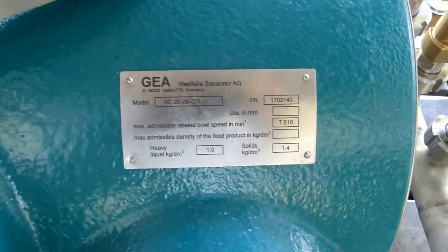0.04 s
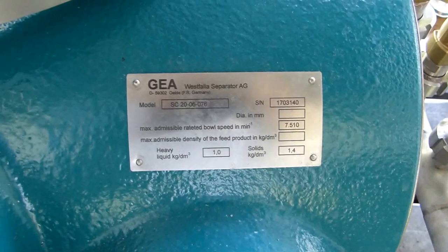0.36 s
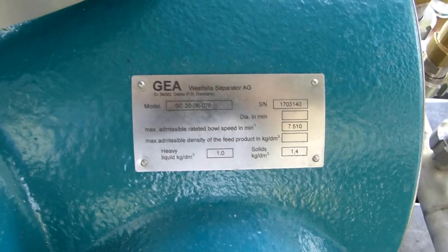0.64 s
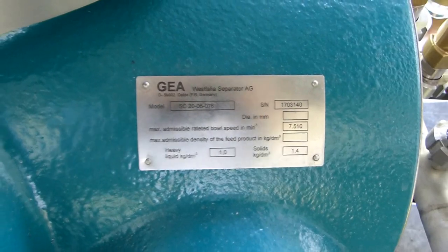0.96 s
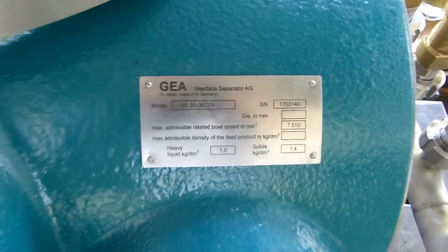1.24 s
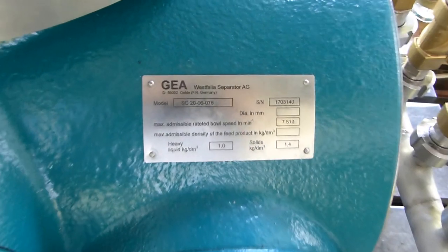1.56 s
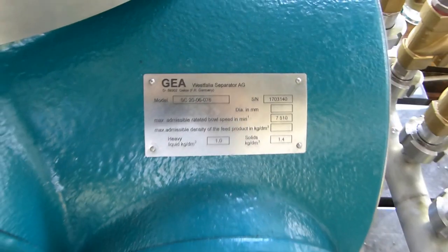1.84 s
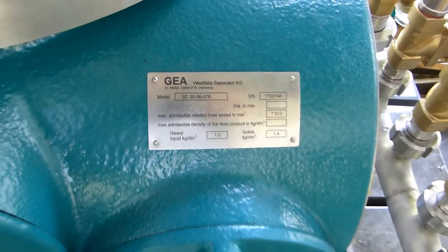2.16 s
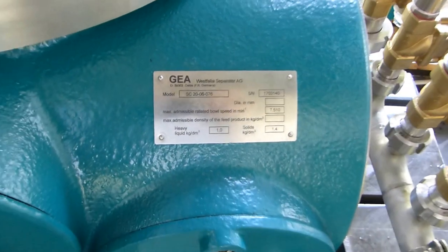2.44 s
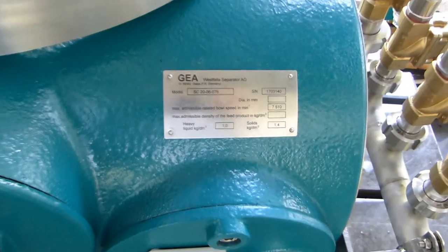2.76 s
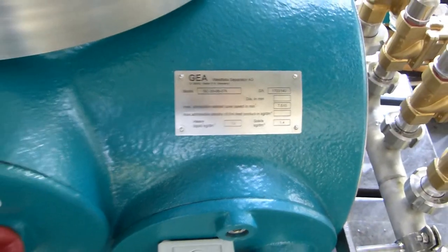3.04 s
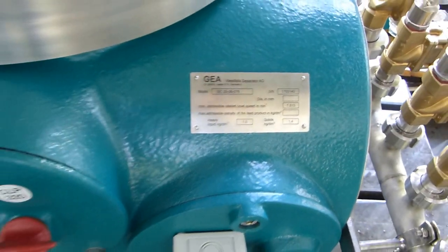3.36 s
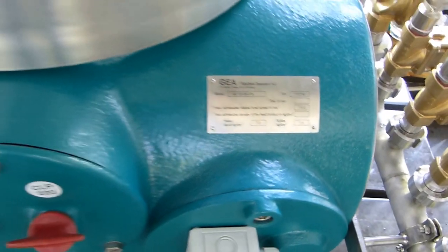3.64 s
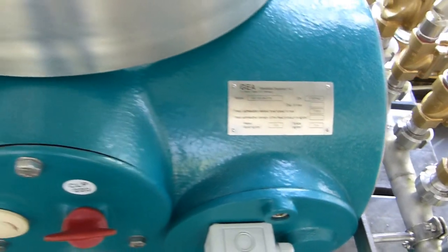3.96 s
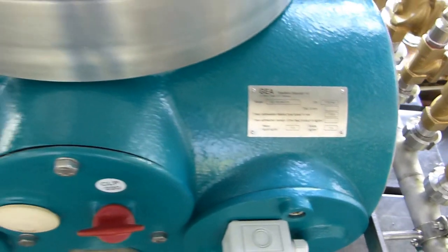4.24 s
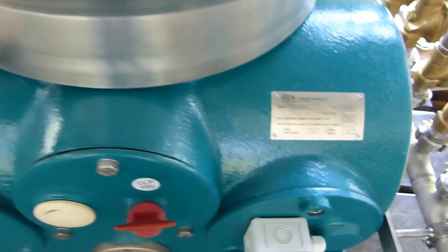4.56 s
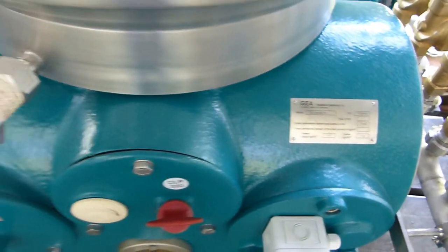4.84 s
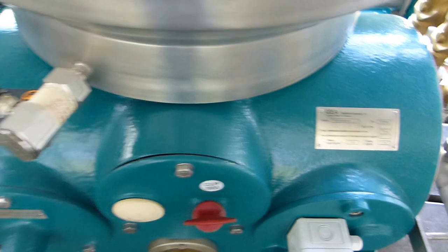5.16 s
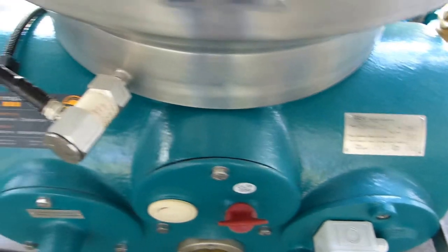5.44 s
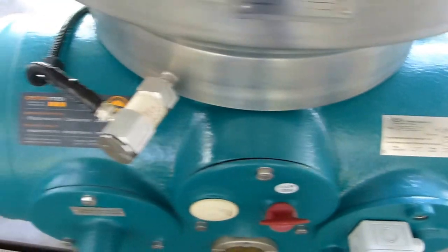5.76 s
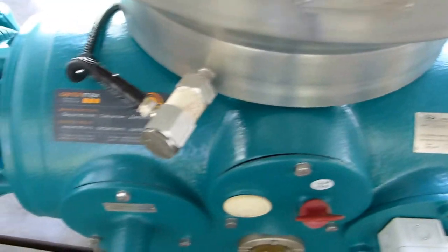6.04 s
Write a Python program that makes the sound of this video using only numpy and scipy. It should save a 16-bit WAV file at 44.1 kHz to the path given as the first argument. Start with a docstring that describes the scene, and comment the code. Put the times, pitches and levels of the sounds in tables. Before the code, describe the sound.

An industrial separator runs close by, with a steady, slightly rough high whine and hum over rushing air.

```python
"""A steady, slightly rough whine over rushing air: a centrifugal separator, close by in a workshop.
The spinning bowl whines on its twelfth order, with side tones one order apart. The slower motor adds
its own lines, and air and liquid rush through the ringing housing. The speed stays constant, but the
microphone drifts through standing waves and beams of sound, so tones swell, fade and change sides."""
import sys
import numpy as np
from scipy import signal
from scipy.fft import rfft, irfft
from scipy.io import wavfile

SR = 44100
rng = np.random.default_rng(int(sys.argv[2]) if len(sys.argv) > 2 else 0)


def store_wav(level_fs):
    """Save 16-bit WAV to argv[1]."""
    pcm = np.round(np.clip(np.atleast_2d(level_fs), -1, 1) * 32767)
    wavfile.write(sys.argv[1], SR, pcm.T.astype(np.int16))


N = 268569
TIME = np.arange(N) / SR
BIN_HZ = np.maximum(np.arange(N // 2 + 1) * SR / N, 1)
SIDES = np.array([[1], [-1]])   # left, right
BOWL_HZ, MOTOR_HZ = 126.9, 24.562   # turns per second
SWING_RAD_PER_S = 0.32   # the microphone turns, so the left side leads more and more


def bowl():
    """The spinning bowl: its whine, the neighbouring orders that roughen it, and fainter harmonics."""
    # strong orders as standing waves: (order, left [dB], right [dB], change [dB/s], node at [s],
    # node spacing [s], left echo [0-1], right echo [0-1], loudness swing factor, left lead [rad], flutter)
    orders = [(4, -47.5, -42.5, 1.5, 5.52, 9.9, 0.93, 1, 1.16, -0.8, 0.27),
              (5, -38.9, -27.5, -0.6, 1.84, 10.1, 0.05, 0.51, 1.6, -0.76, 0.03),
              (6, -31.5, -32.5, -0.08, 3.31, 10.6, 0.84, 1, 0.97, -0.3, 0),
              (11, -28, -26, 1.4, 0.92, 4.7, 0.3, 0.98, 0.45, -0, 0.036),
              (13, -38, -40, 1.05, 4.12, 2.05, 0.11, 0.46, 0.81, -0.9, 0.18),
              (24, -42.1, -39, -0.5, 5.63, 1.65, 0.8, 0.66, 0.01, 0.0, 0.07)]
    # weak orders: (rough pitch [Hz], level at mid-path [dB], change [dB/s])
    faint = [(127, -61, -3), (254, -57.5, 0.5), (888, -67, 2), (1015, -49, 0), (2284, -51.5, 1),
             (2918, -48.5, -1), (3172, -47, -0.5), (4568, -55, -3.5), (4822, -53, 1.5)]
    angle = shaft(BOWL_HZ, wander=0.00004)
    return whine(angle) + standing_orders(angle, orders) + faint_orders(angle, BOWL_HZ, faint)


def whine(angle, gain_db=1.09):
    """The bowl's loud twelve-per-turn tone, and its octave, which is beamed one way."""
    # whine along the microphone's path: (time [s], relative level [dB], left minus right [dB])
    path = [(0.25, -16, 2.0), (0.35, -14, 2.5), (0.87, -15.5, 4), (1.53, -15, 10), (2.13, -13.5, 5),
            (2.77, -15, 4.5), (3.29, -16, 0), (3.55, -19, -3), (3.84, -24.5, -13), (4.26, -21.5, -6),
            (5.23, -12.5, -1.0), (5.77, -13, -2.0), (5.93, -15, -6), (6.08, -17.5, -13)]
    # which side the whine reaches first: (time [s], left lead [rad])
    lead = [(1.05, 0.45), (1.8, -0.63), (3.5, 0.09), (4.05, -1.05), (6.08, 0.71)]
    level_db, pan_db = in_time(path)
    balance = from_db(SIDES * pan_db / 2)
    gains = from_db(level_db + gain_db) * balance / balance.mean(axis=0)
    octave_db = through_beam(off_db=-64.5, extra_db=30.5, at_s=1.52, half_width_s=0.62)
    octave = strong_tone(24 * angle, from_db(octave_db), along_path(0, SWING_RAD_PER_S), flutter=0.08)
    return strong_tone(12 * angle, gains, in_time(lead)[0], flutter=0.023) + octave


def motor(angle):
    """The drive hums low and whines just under the bowl's tone, beating with it."""
    # hum and whine as standing waves: (order, left [dB], right [dB], change [dB/s], node at [s],
    # node spacing [s], left and right echo [0-1], loudness swing factor, left lead [rad], flutter)
    orders = [(8, -48.0, -51, -3.2, 1.32, 10, 0.0, 0.48, 0.5, -0.2, 0.15),
              (60, -32, -34, -1.1, 5.66, 6.4, 0.95, 0.7, 1.1, 0.1, 0.076)]
    # weak orders: (rough pitch [Hz], level at mid-path [dB], change [dB/s])
    faint = [(147, -56, -1.2), (1498, -67, -0.91), (1529, -38, -1.8), (1554, -38, -0.37),
             (1631, -44.5, 0.23), (2485, -49, -0.92), (2660, -50, -.5)]
    return standing_orders(angle, orders) + faint_orders(angle, MOTOR_HZ, faint)


def shaft(hz, wander):
    """Angle of a steady rotation whose speed hardly wanders."""
    return 2 * np.pi * np.cumsum(hz * (1 + wander * drift(0.94))) / SR


def standing_orders(angle, orders):
    """Each order meets its own reflection and fades at evenly spaced nodes on the microphone's path."""
    swing_db, out = loudness_swing(), 0
    for order, left_db, right_db, change, node_s, spacing_s, *echoes, follows, lead, flutter in orders:
        reflection = np.vstack(echoes) * np.exp(2j * np.pi * (TIME - node_s) / spacing_s)
        change_db = along_path(0, change) + follows * swing_db
        gains = abs(1 - reflection) * from_db([[left_db], [right_db]]) * from_db(change_db)
        out += strong_tone(order * angle, gains, along_path(lead, SWING_RAD_PER_S), flutter)
    return out


def faint_orders(angle, shaft_hz, lines):
    """Weak tones, each locked to the nearest multiple of its shaft's speed."""
    return sum(faint_tone(round(hz / shaft_hz) * angle, along_path(db, change))
               for hz, db, change in lines)


def strong_tone(phase, gains, lead, flutter):
    """A tone that leads on the left by `lead` radians; moving air shakes its level and phase."""
    shaken = 1 + flutter * (drift(18) + 1j * drift(22))
    return np.sqrt(2) * np.real(shaken * gains * np.exp(1j * (phase + SIDES * lead / 2)))


def faint_tone(phase, db, swell=0.24, apart=0.25):
    """A weak line that swells and fades at random, a little differently on each side."""
    common = 1 + swell * (drift(2.9) + 1j * drift(4.2))
    side = apart * drift(0.5) * np.exp(2j * np.pi * rng.random())
    carrier = np.exp(1j * (phase + 2 * np.pi * rng.random()))
    return np.sqrt(2) * from_db(db) * np.real((common + SIDES * side) * carrier)


def rush(motor_angle, rumble_edge_hz=450, ring_split_hz=1165, hiss_edge_hz=1450):
    """Turbulence round the bowl: rumble, ringing housing and hiss, with the drive's buzz underneath."""
    colour, housing = rush_spectra()
    # lows, the two main resonances and highs radiate in different directions
    low_share = 1 / (1 + (BIN_HZ / rumble_edge_hz) ** 6)
    high_share = 1 / (1 + (hiss_edge_hz / BIN_HZ) ** 12)
    lower_share = 1 / (1 + (BIN_HZ / ring_split_hz) ** 40)
    ring = colour * np.sqrt((1 - low_share) * (1 - high_share))
    rumble_db = rush_level(-0.69, follows=1, close_db=0.8) + SIDES * along_path(4.5, per_s=-1.5) / 2
    lower_db = rush_level(-1.2, follows=0.75, close_db=3.7)
    upper_db = rush_level(0.2, follows=0.66, close_db=-1.7)
    hiss_db = rush_level(0, follows=0.99, close_db=0)
    rumble = stereo_noise(colour * np.sqrt(low_share)) * from_db(rumble_db)
    lower_ring = stereo_noise(ring * np.sqrt(lower_share)) * from_db(lower_db)
    upper_ring = stereo_noise(ring * np.sqrt(1 - lower_share)) * from_db(upper_db)
    hiss = stereo_noise(colour * np.sqrt(high_share)) * from_db(hiss_db + 0.61 * drift(21))
    buzz = drive_buzz(motor_angle, housing) * from_db(hiss_db - 9)
    churn = from_db(0.6 * drift(7.1))
    return rumble + (lower_ring + upper_ring) * churn + hiss + buzz


def rush_spectra(hollow_hz=4450, hollow_width_hz=140, hollow_db=-2.7):
    """Spectra of the whole rush, with a hollow in its hiss, and of the ringing housing alone."""
    # broad rush of air and liquid: (frequency [Hz], density [dB per Hz])
    flow = [(25.0, -71), (52.0, -90.2), (100.0, -76), (175.0, -69), (290.0, -66.5), (440.0, -72.5),
            (620.0, -74), (950.0, -70), (1800.0, -64.5), (4350.0, -68), (7600.0, -67.5), (9700.0, -76),
            (12200.0, -82), (15000.0, -97.5)]
    # housing resonances that the rush excites: (centre [Hz], width [Hz], relative peak [dB])
    modes = [(252, 6.6, -56), (517.5, 23, -59), (631, 80, -60), (789, 75, -58.5), (890, 34, -61),
             (1096.4, 18.7, -48), (1149, 107, -51.5), (1373, 143, -55.5), (1530, 126, -60), (1790, 32, -59),
             (1888, 68, -60.5), (2132, 58, -60), (2400, 34, -58), (2534, 40, -55.5), (2695, 95, -61.7),
             (3010, 51, -60), (3280, 105, -64.5), (3720, 350, -67), (4040, 200, -65), (4980, 720, -64.5),
             (5940, 540, -70), (8025, 450, -95)]
    broad = from_db(over_hz(flow)[0])
    housing = np.sqrt(sum((from_db(db) * resonance(hz, width)) ** 2 for hz, width, db in modes))
    hollow = from_db(hollow_db * np.exp(-((BIN_HZ - hollow_hz) / hollow_width_hz) ** 2))
    return np.hypot(broad, 0.82 * housing) * hollow, housing


def rush_level(gain_db, follows, close_db, draw_back_s=1.42, ease_s=0.13):
    """Gain in dB of one part of the rush; the microphone starts close to the housing, then draws back."""
    close = (1 - np.tanh((TIME - draw_back_s) / ease_s)) / 2
    return gain_db + follows * loudness_swing() + close_db * close


def drive_buzz(angle, housing):
    """The same small roughness comes round on every motor turn and shakes the housing."""
    one_turn = rng.standard_normal(round(SR / MOTOR_HZ))
    position = (angle / (2 * np.pi) * len(one_turn)).astype(int) % len(one_turn)
    return irfft(rfft(one_turn[position]) * housing, N) * np.sqrt(SR / 2)


def beamed_rings():
    """Two housing resonances stand out while the microphone faces them."""
    # directional resonances: (centre [Hz], width [Hz], level off the beam [dB], extra on it [dB],
    # crossed at [s], half-width [s])
    modes = [(1213, 24, -56, 19, 4.7, .8), (2800, 650, -57, 23.5, 4.17, 1.1)]
    out = 0
    for centre_hz, width_hz, *beam in modes:
        ring = stereo_noise(resonance(centre_hz, width_hz))
        out += ring / ring.std() * from_db(through_beam(*beam))
    return out


def stray_tones(whistle_hz=11925):
    """A few wavering lines between the shaft orders, and a thin whistle high above the rest."""
    # tones that follow neither shaft: (pitch [Hz], level at mid-path [dB], change [dB/s])
    tones = [(307, -64, 1.5), (819, -50, -4.5), (1168, -42.5, -4), (1426, -41.5, -0.5), (2600, -50, -4),
             (2635, -48.5, 2), (3790, -53, -1)]
    lines = sum(faint_tone(shaft(hz, wander=0.000678), along_path(db, change))
                for hz, db, change in tones)
    whistle_phase = shaft(whistle_hz, wander=0.0003) + 1.5 * drift(15)
    whistle_db = through_beam(off_db=-74, extra_db=13.5, at_s=-3, half_width_s=1.8)
    return lines + faint_tone(whistle_phase, whistle_db)


def workshop(direct, wet=0.29, t60_s=0.16, spots=4):
    """Room reflections ripple the spectrum; their pattern changes from spot to spot along the path."""
    decay = from_db(-60 * np.arange(SR // 4) / SR / t60_s)
    out = direct.copy()
    for spot in range(spots):
        tail = rng.standard_normal(len(decay)) * decay
        reflections = signal.oaconvolve(direct, tail[None] / np.linalg.norm(tail), axes=1)[:, :N]
        nearness = np.clip(1 - abs(np.linspace(0, spots - 1, N) - spot), 0, 1)
        out += wet * np.sqrt(nearness) * reflections
    return out / np.sqrt(1 + wet ** 2)


def loudness_swing():
    """How far the rush and side tones swell or sink from their average, in dB; up as the whine fades."""
    # level of the rush over time: (time [s], relative level [dB])
    levels = [(0.25, -29), (0.59, -28), (1.57, -28), (2.14, -30.5), (3.12, -30), (4.13, -26), (4.48, -27),
              (5.42, -34), (6.05, -31)]
    level_db, = in_time(levels)
    return level_db - level_db.mean()


def through_beam(off_db, extra_db, at_s, half_width_s):
    """A level in dB that peaks where the microphone crosses a beam of sound."""
    return off_db + extra_db * np.exp(-((TIME - at_s) / half_width_s) ** 2)


def along_path(middle, per_s):
    """A level or lead that changes steadily as the microphone moves."""
    return middle + per_s * (TIME - N / 2 / SR)


def stereo_noise(density):
    """Noise of the given amplitude per root Hz, partly alike on the two sides."""
    # stereo image of the rush: (frequency [Hz], left-right likeness [0-1], left minus right [dB])
    image = [(40, .1, -6), (150, 0.89, 3.5), (310, 0.22, -3), (600, 0.31, -2), (1100, 0.71, -3.5),
             (1600, .72, -2), (4500, 0.78, -1.5), (7660, 0.69, -1), (9600, 0.18, -3), (12500, 0.46, -4)]
    alike, pan_db = over_hz(image)
    mid, side = rfft(rng.standard_normal((2, N)))
    pair = np.sqrt(1 + alike) * mid + np.sqrt(1 - alike) * side * SIDES
    return irfft(pair * density * from_db(pan_db * SIDES / 2), N) * np.sqrt(SR) / 2


def resonance(centre_hz, width_hz):
    """The spectral peak of one housing mode, of height 1."""
    return 1 / (1 + 2 * ((BIN_HZ - centre_hz) / width_hz) ** 2)


def drift(rate_hz, hop=40, settle=2000):
    """Smooth random motion of spread 1."""
    pole = np.exp(-2 * np.pi * hop * rate_hz / SR)
    noise = rng.standard_normal(N // hop + settle + 2)
    slow = signal.lfilter([1], [1, -2 * pole, pole * pole], noise)[settle:]
    return np.interp(np.arange(N) / hop, np.arange(len(slow)), (slow - slow.mean()) / slow.std())


def in_time(rows):
    """Each column of a curve at every sample."""
    times, *columns = np.transpose(rows)
    return [np.interp(TIME, times, column) for column in columns]


def over_hz(rows):
    """Each column of a spectrum at every bin, joined on a log-frequency axis."""
    hz, *columns = np.transpose(rows)
    return [np.interp(np.log(BIN_HZ), np.log(hz), column) for column in columns]


def from_db(db):
    """Decibels to gain."""
    return 10 ** (np.asarray(db) / 20)


def scene():
    """The whole separator from close by, with the workshop's reflections on its rush."""
    motor_angle = shaft(MOTOR_HZ, wander=0.00005)
    return bowl() + motor(motor_angle) + stray_tones() + workshop(rush(motor_angle)) + beamed_rings()


def record(dry, start_s=0.1844, cutoff_hz=15200):
    """The sound cuts in abruptly; the top treble is cut off steeply."""
    opened = np.clip((TIME - start_s) / 0.001, 0, 1)
    return signal.sosfilt(signal.ellip(10, 0.1, 80, cutoff_hz, fs=SR, output="sos"), dry * opened)


dry = scene()
out = record(dry)
store_wav(out)
```